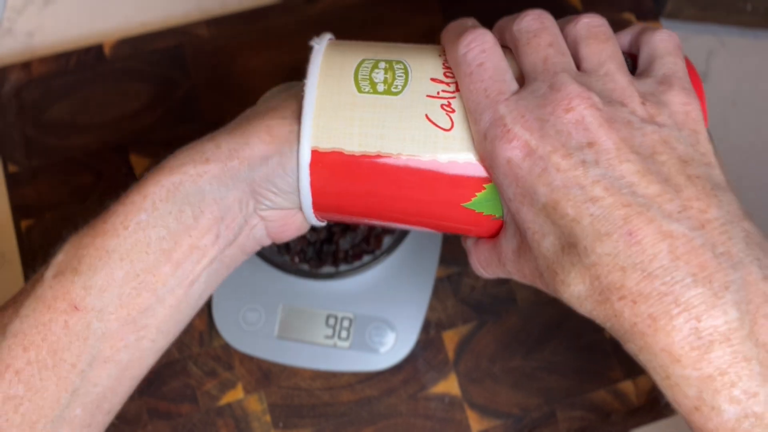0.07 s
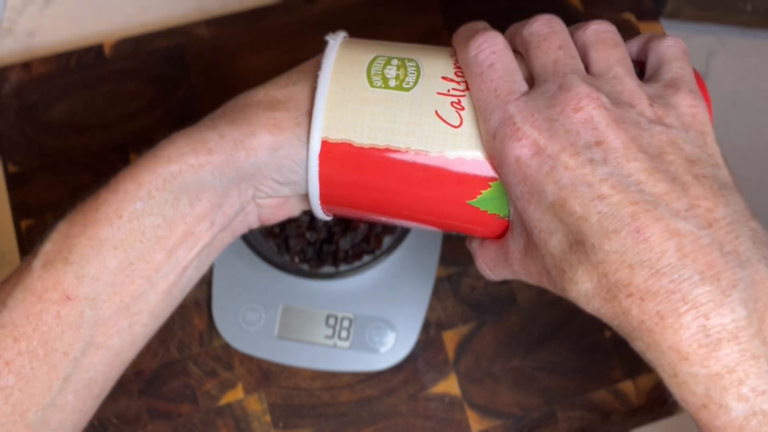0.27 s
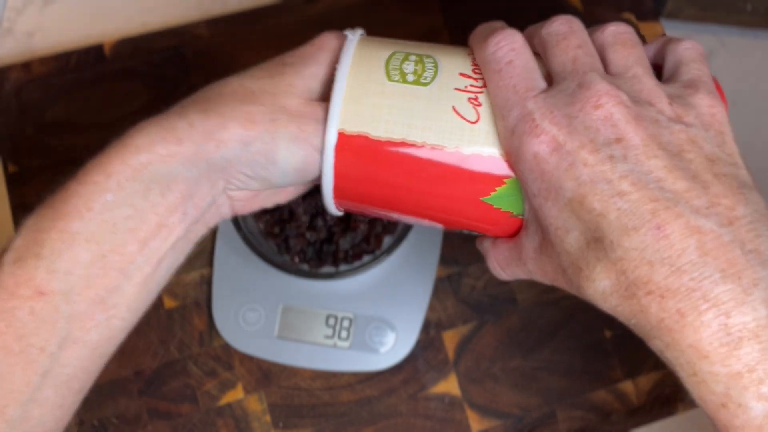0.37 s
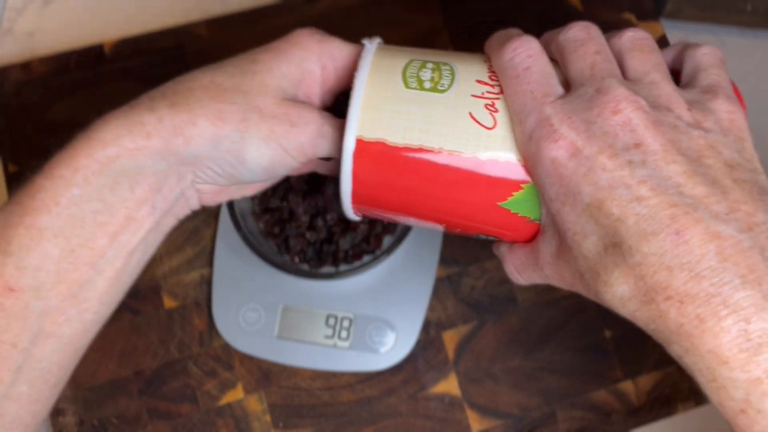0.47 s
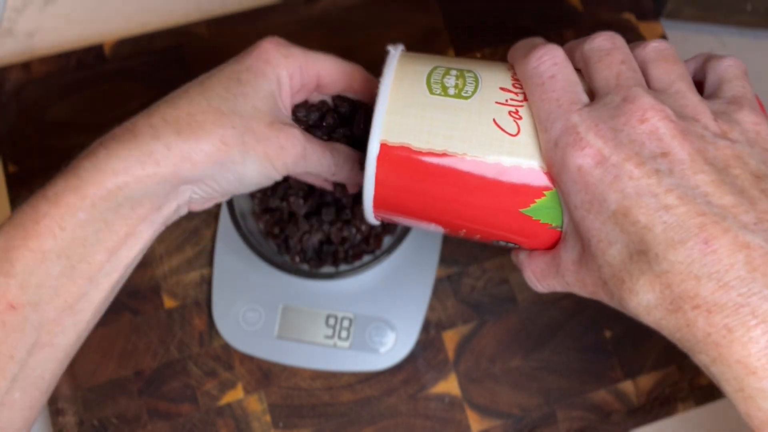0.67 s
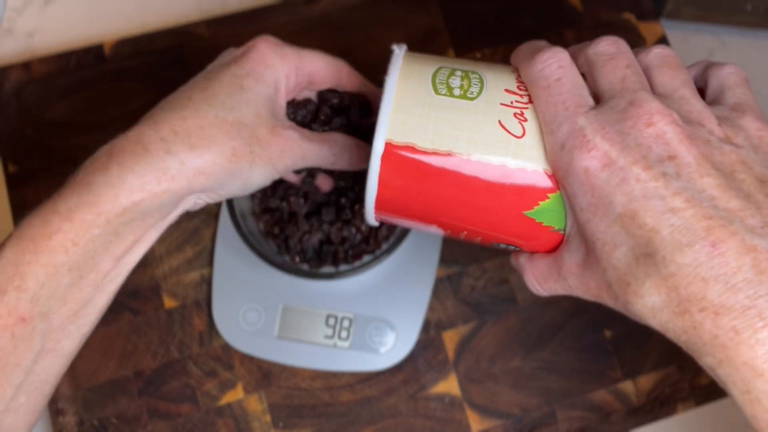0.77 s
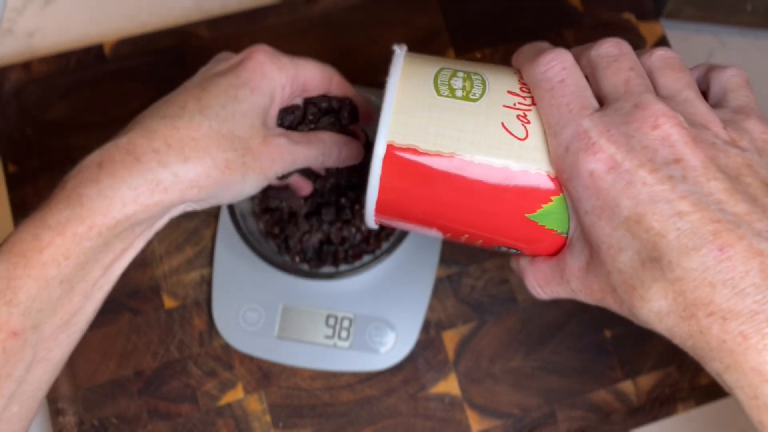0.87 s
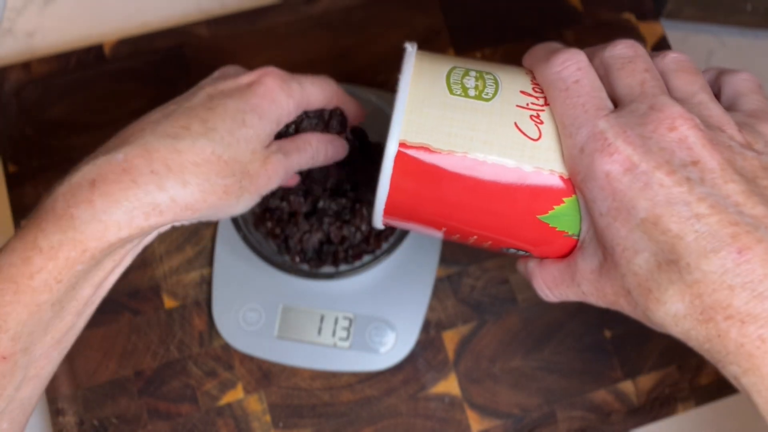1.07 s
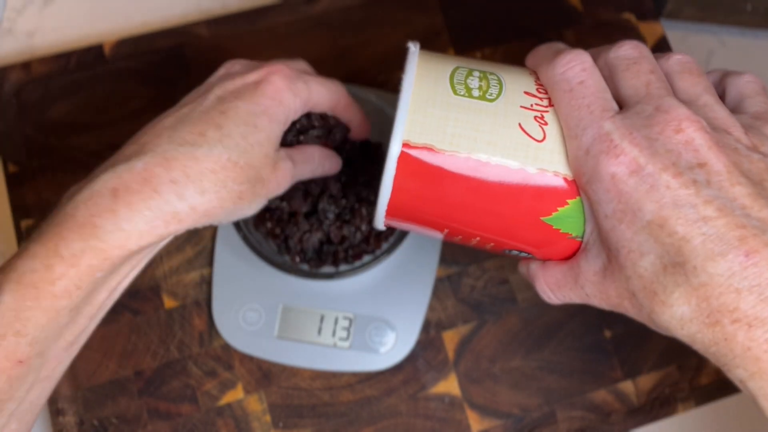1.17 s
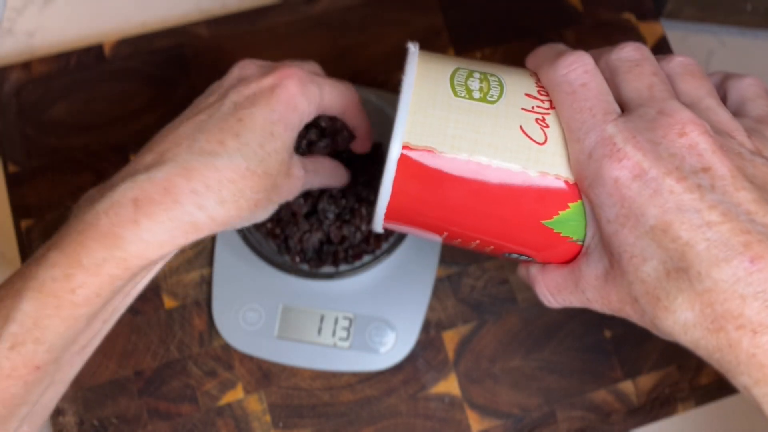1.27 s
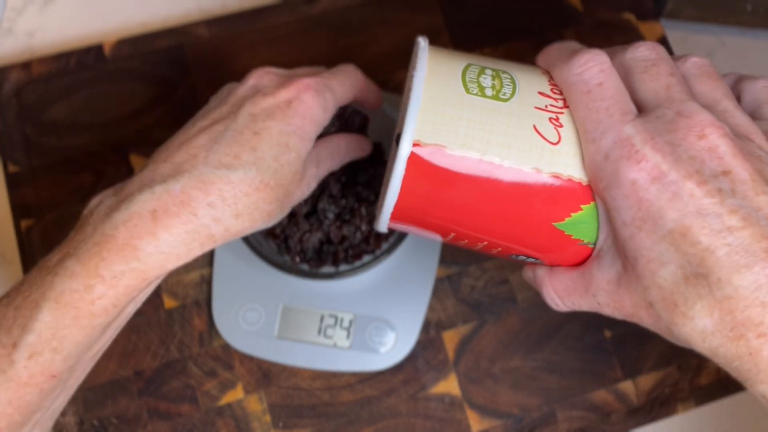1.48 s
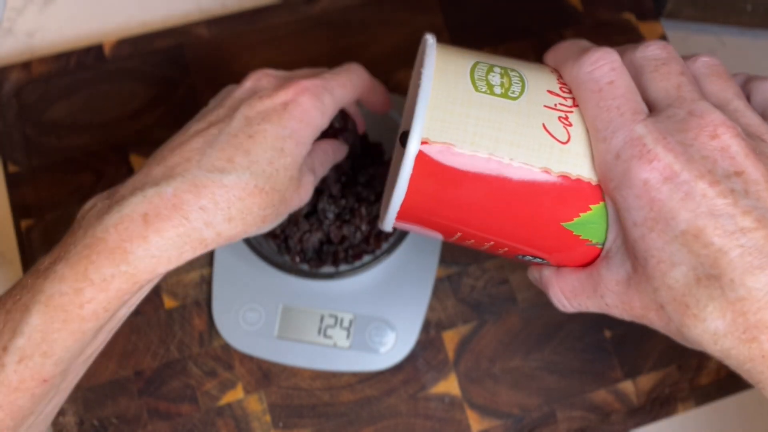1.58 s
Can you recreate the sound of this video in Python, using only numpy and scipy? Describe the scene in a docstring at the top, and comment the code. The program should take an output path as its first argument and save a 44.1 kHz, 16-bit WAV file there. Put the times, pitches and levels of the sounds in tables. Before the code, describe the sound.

Close stereo pickup in a small quiet room: dry rustling along card builds into hollow, papery knocks, fades, one soft fruit landing follows, then several faint, dull clinks of raisins in a glass bowl.

```python
"""A hand drags raisins out of a cardboard canister into a glass bowl in a quiet kitchen.
Skin and fruit rub along the card: dense friction grains, filtered into a coloured hiss with faint rings.
Clumps knock on the hollow tube, each a burst of noise and a force on damped modes; raisins ping the
glass, whose modes come in beating pairs, and land with soft tocks. Decaying noise gives the echoes;
room noise, a low rumble and a faint wavering tone, both resonant noise, lie behind."""
import sys
import numpy as np
from scipy import signal
from scipy.io import wavfile

SR = 44100
rng = np.random.default_rng(int(sys.argv[2]) if len(sys.argv) > 2 else 0)


def digitize_waveform(pressure):
    """Quantize a signal to 16-bit integers and store it at the path in sys.argv[1].

    Rows of a 2-D input are taken as channels; values are limited to [-1, 1].
    """
    field = np.atleast_2d(pressure).T
    bounded = np.clip(field, -1, 1)
    quanta = np.round(bounded * 32767).astype(np.int16)
    wavfile.write(sys.argv[1], SR, quanta)


N = 70560  # samples

# Clumps striking the tube. Each row: start in seconds, tick level in dB, level of the tick's top end in dB,
# tick rise in ms, tick T60 in ms, thump force in dB on the low, middle and high modes,
# thump delay in ms, contact length in ms.
KNOCKS = [(0.1968, -39, -49, 3.2, 17, -68, -55.5, -42, 2, 4),
          (0.3197, -50, -53, 1.3, 16, -48, -73, -59, 2.34, 2.2),
          (0.3403, -56, -56, 1.7, 16, -50, -35.5, -44, 2.47, 2.42),
          (0.3967, -66, -75, 1.3, 12, -38.5, -44, -39.5, 2.4, 3.4),
          (0.4197, -53, -48, 1.9, 16, -39.5, -47, -54, 2.7, 5.3),
          (0.4261, -43.5, -45.5, 1.5, 14, -38.5, -49, -44, 2.4, 3.9),
          (0.455, -30, -40.5, 1.77, 21.6, -22.5, -26.5, -32, 2.323, 3.72),
          (0.4654, -34.5, -66, 0.64, 10.3, -54, -62, -40, 3, 5.6),
          (0.4784, -72, -80, 1.3, 16, -51, -79, -52, 2.4, 3.8),
          (0.5067, -32.5, -62, 3.15, 11, -55, -64, -38.5, 2.4, 5),
          (0.527, -46.5, -54, 2, 15, -40.5, -38, -53, 2.36, 3),
          (0.5329, -46.5, -74.5, 1.3, 16, -55, -47, -61, 2.32, 3.9),
          (0.5958, -31.5, -38.5, 1.03, 20, -36, -27.5, -37, 2.56, 3.4),
          (0.6529, -43, -52, 3.4, 11, -46, -82, -58, 2.34, 4),
          (0.6871, -44.5, -39.5, 1.6, 15.7, -37.5, -32, -47, 2.4, 2.56),
          (0.8587, -62, -68, 1.2, 14, -65, -69, -80, 2.6, 1.9),
          (0.9381, -36.5, -65, 2.3, 11.5, -40, -37.5, -43, 2.38, 2.65)]


def amp(db):
    """Level to amplitude: 20 dB is a factor of ten."""
    return 10 ** (np.asarray(db) / 20)


def rms_one(x):
    """Normalise the mean power to 1."""
    return x / np.sqrt(np.mean(x ** 2) + 1e-20)


def in_time(rows):
    """Linear interpolation: each column of a time table at every sample."""
    seconds, *columns = np.transpose(rows)
    return [np.interp(np.arange(N) / SR, seconds, column) for column in columns]


def at_hz(points, hz):
    """Interpolation on a logarithmic frequency axis."""
    table = np.array(points)
    return np.interp(np.log(hz), np.log(table[:, 0]), table[:, 1])


def drift(rate_hz):
    """Slow fluctuation: low-passed noise of rms 1, computed every 40 samples."""
    r = np.exp(-2 * np.pi * rate_hz * 40 / SR)
    noise = rng.standard_normal(N // 40 + 2002)
    slow = signal.lfilter([1], [1, -2 * r, r * r], noise)[2000:]  # the filter has settled by then
    return np.interp(np.arange(N) / 40, np.arange(len(slow)), rms_one(slow))


def ring(x, hz, t60, lead=0):
    """Damped oscillator: a unit click starts a decaying sine of height 1 at phase lead (rad)."""
    r = amp(-60 / (t60 * SR))
    w = 2 * np.pi * hz / SR
    return signal.lfilter([np.sin(lead), r * np.sin(w - lead)], [1, -2 * r * np.cos(w), r * r], x + 1e-18)


def both_sides(x, hz, t60, lr_db, lead):
    """Stereo mode: one damped oscillator with a level and a phase difference between the channels."""
    left = amp(lr_db / 2) * ring(x, hz, t60, lead / 2)
    right = amp(-lr_db / 2) * ring(x, hz, t60, -lead / 2)
    return np.array([left, right])


def soften(x, hz):
    """Soft contact: a double one-pole low-pass removes the treble."""
    r = np.exp(-2 * np.pi * np.clip(hz, 50, 15000) / SR)
    return signal.lfilter([(1 - r) ** 2], [1, -2 * r, r * r], x)


def grains(per_s, spread_db, size):
    """Shot noise: clicks at random instants, of uneven size and random sign."""
    born = rng.random(size) < per_s / SR
    excess_db = spread_db * np.minimum(rng.exponential(1, size), 5)
    return born * amp(excess_db) * rng.choice([-1, 1], size)


def banded(source, spectrum, patchy_db):
    """Third-octave synthesis: bands of two mid-side pairs, each with its own flicker and coherence; rms 1."""
    # Likeness of the channels. Each row: frequency in Hz, left-right correlation.
    likeness = [(30, .99), (125, 0.73), (500, 0.23), (2000, 0.45), (4000, 0.56), (5000, 1), (8000, 1),
                (9000, 0.25), (11000, 0.05)]
    out = 0
    together = drift(2)  # flicker common to all bands
    lowest, highest = spectrum[0][0], spectrum[-1][0]
    edges = lowest * 2 ** np.arange(0, np.log2(highest / lowest) + .01, 1 / 3)
    for k, (low, high) in enumerate(zip(edges, edges[1:])):
        band = signal.butter(2, [low, high], "band", fs=SR, output="sos")
        mid, side = signal.sosfilt(band, source[k % 2])  # neighbouring bands use unrelated pairs
        hz = np.sqrt(low * high)
        alike = np.clip(at_hz(likeness, hz), -1, 1)
        gain = amp(at_hz(spectrum, hz) + patchy_db * (together + drift(14)))
        out = out + gain * (np.sqrt(1 + alike) * mid + np.sqrt(1 - alike) * side * [[1], [-1]])
    return rms_one(out)


def rubbing(hiss_db):
    """Sliding friction: dense grains coloured by the card, which sings faintly at narrow resonances."""
    # Colour of the rub. Each row: frequency in Hz, relative density in dB per Hz.
    rub_spectrum = [(880, -61), (1500, -3), (2020, -4), (2830, -12.5), (3360, -2.5), (4490, -8.5),
                    (6300, -3.5), (9830, -15), (10500, -13), (10800, -47.5), (14000, -40.5), (22000, -120)]
    # Rings of the card. Each row: frequency in Hz, level in dB relative to the rub, T60 in seconds.
    rub_rings = [(5920, -19, 0.053), (6425, -18, .02), (6590, -14.5, .02)]
    grains_per_s, spread_db, patchy_db = 2500, 2.5, .7
    rub = banded(grains(grains_per_s, spread_db, size=(2, 2, N)), rub_spectrum, patchy_db)
    mono = rub.mean(axis=0)
    rings = sum(amp(db) * rms_one(ring(mono, hz, t60)) for hz, db, t60 in rub_rings)
    return amp(hiss_db) * (rub + rings)


def handling(low_db):
    """Low handling noise: band-passed noise, partly correlated between the channels."""
    band = signal.butter(2, (119, 410), "band", fs=SR, output="sos")  # Hz
    mid, side = signal.sosfilt(band, rng.standard_normal((2, N)))
    return amp(low_db) * rms_one(mid + 0.49 * side * [[1], [-1]])


def knock_pushes(t):
    """Contact force: a click and a short burst of grit for each knock, rounded by the soft contact."""
    grit_amount, contact_hz = 2.36, 2400
    pushes = []
    for *_, contact_ms in KNOCKS:
        grit = rng.standard_normal(len(t)) * t * np.exp(-2000 * t / max(contact_ms, .1))
        grit = grit / np.sqrt(np.sum(grit ** 2))
        pushes.append(soften((t == 0) + grit_amount * grit, contact_hz))
    return pushes


def tube(tumble_db):
    """Modal excitation: knocks and tumbling fruit drive every mode of the tube; knocks vary from mode to mode."""
    # Modes of the tube. Each row: frequency in Hz, gain in dB, T60 in seconds,
    # left-right level difference in dB, phase lead of the left in radians.
    tube_modes = [(438, -28.5, 0.12, -40, .5), (518, -22, 0.26, -4.5, 0.27), (569, -3, 0.036, 3.5, 0.23),
                  (657, -5.5, .03, 5.5, 0.23), (863, -9, 0.021, -16, 0.26), (979, -12, 0.032, 11, .7),
                  (1182, -26.5, 0.12, 4, 1.3), (1198, 2.5, 0.011, 3.5, 1.39), (1550, 0.5, 0.017, 0, 0.56),
                  (1813, -11, 0.038, 10, 2.9), (1971, -2.5, 0.026, -2.5, 0.52), (2317, -14, 0.11, 12, 2.6),
                  (2588, -12, 0.041, 4, 3.1)]
    thump_bands_hz, low_cut_hz = (560, 1100, 1900), 502
    tumbles_per_s, tumble_spread_db, tumble_soft_hz = 720, 2, 2670
    knocks, tumble = 0, 0
    t = np.arange(SR // 40) / SR
    fruit = soften(grains(tumbles_per_s, tumble_spread_db, size=N), tumble_soft_hz)
    pushes = knock_pushes(t)
    strength_db = rng.normal(0, 1.5, (len(KNOCKS), len(tube_modes)))
    for k, (hz, db, t60, lr_db, lead) in enumerate(tube_modes):
        force = np.zeros(N + len(t))
        for knock, push, chance_db in zip(KNOCKS, pushes, strength_db):
            start_s, *_, low_db, mid_db, high_db, delay_ms, _ = knock
            i = int((start_s + delay_ms / 1000) * SR)
            thump_db = at_hz(list(zip(thump_bands_hz, (low_db, mid_db, high_db))), hz)
            # Dividing by the push's own spectrum at this mode evens out the drive
            reach = np.abs(np.sum(push * np.exp(-2j * np.pi * hz * t))) + .25
            force[i:i + len(t)] += amp(thump_db + chance_db[k]) * push / reach
        knocks = knocks + amp(db) * both_sides(force[:N], hz, t60, lr_db, lead)
        tumble = tumble + amp(db) * both_sides(fruit, hz, t60, lr_db, lead)
    out = knocks + amp(tumble_db) * rms_one(tumble)
    return signal.sosfilt(signal.butter(5, low_cut_hz, "high", fs=SR, output="sos"), out)


def ticks():
    """Broadband impact noise: each knock's bright burst and hissy tail, with the top end levelled apart."""
    # Colour of the ticks. Each row: frequency in Hz, relative density in dB per Hz.
    tick_spectrum = [(1470, -40), (2500, -4), (3150, -4), (3790, 12.5), (4550, -16.5), (5400, 4.5),
                     (5950, 10.5), (7060, -7.5), (10800, -14), (14000, -55), (22000, -120)]
    tail_db, tail_t60_s, split_hz, patchy_db = -16, 0.074, 10000, .5
    t = np.arange(SR // 10) / SR
    level = np.zeros((2, N + SR))
    for start_s, db, top_db, rise_ms, t60_ms, *_ in KNOCKS:
        rise = np.minimum(1000 * t / max(rise_ms, .05), 1)
        decay = amp(-60000 * t / max(t60_ms, 1))
        tail = amp(tail_db - 60 * t / tail_t60_s)
        i = int(start_s * SR)
        level[:, i:i + len(t)] += amp([[db], [top_db]]) * rise * (decay + tail)
    noise = banded(rng.standard_normal((2, 2, N)), tick_spectrum, patchy_db)
    below = rms_one(signal.sosfilt(signal.butter(3, split_hz, "low", fs=SR, output="sos"), noise))
    top = rms_one(signal.sosfilt(signal.butter(3, split_hz, "high", fs=SR, output="sos"), noise))
    return level[0, :N] * below + level[1, :N] * top


def bowl():
    """Split modes: raisins touch dully and chatter; close twin modes of the glass swell and beat."""
    # Raisins on the glass. Each row: start in seconds, drive of the dull touch in dB,
    # drive in dB of each of the five modes.
    pings = np.array([(0.7159, -60, -52.5, -75, -63, -84, -67), (0.7441, -59, -63, -69, -82, -75, -67),
                      (0.8989, -51, -63, -73, -61.5, -83, -80), (0.9724, -45, -58, -59, -60.5, -62, -59.5),
                      (1.4889, -48.5, -58, -69.5, -73, -91, -76),
                      (1.495, -42.5, -52.5, -75, -68, -78, -79.5),
                      (1.5094, -38.5, -49.5, -50.5, -52.5, -68, -61),
                      (1.5224, -56, -50, -53.5, -66, -81, -75), (1.5474, -46.5, -55, -57, -60, -71, -51),
                      (1.5674, -66, -77, -58, -72, -94, -81), (1.5776, -67, -51.5, -82, -60, -104, -72),
                      (1.5875, -45.5, -43, -66, -61, -81, -75)])
    # Modes of the glass. Each row: frequency in Hz, spacing of the twin mode above in Hz, T60 in seconds,
    # left-right level difference in dB, phase lead of the left in radians.
    glass_modes = [(1729, 22, 0.18, 4.5, 1.83), (3433, 11.5, 0.23, -1.5, 1.3),
                   (5700, 30, 0.098, -0.5, 0.44), (6837, 73, 0.059, -5, .3), (8490, 44, 0.081, -1, 1.44)]
    rise_ms, twin_db, thud_hz, thud_t60_s = 1.14, -16, 1744, 0.01
    chatter_per_s, chatter_spread_db, chatter_db, chatter_t60_s = 400, 2.0, -23, .05
    at = (pings[:, 0] * SR).astype(int)
    out = 0
    rise = np.exp(-1000 / (rise_ms * SR))
    fade = amp(-60 / (chatter_t60_s * SR))
    chatter = grains(chatter_per_s, chatter_spread_db, size=N)
    for k, (hz, twin_hz, t60, lr_db, lead) in enumerate(glass_modes):
        clicks = np.zeros(N)
        clicks[at] = amp(pings[:, 2 + k])
        clicks += amp(chatter_db) * chatter * signal.lfilter([1], [1, -fade], clicks)
        # A short burst at the mode's own pitch makes the ring swell in
        burst = signal.lfilter([1 - rise], [1, -rise * np.exp(2j * np.pi * hz / SR)], clicks)
        contact = burst.real * 2
        out = out + both_sides(contact, hz, t60, lr_db, lead)
        out = out + amp(twin_db) * both_sides(contact, hz + twin_hz, t60, -lr_db, -lead)
    thud = np.zeros(N)
    thud[at] = amp(pings[:, 1])
    return out + ring(soften(thud, thud_hz), thud_hz, thud_t60_s)


def tocks():
    """Impulse response: a softened click sets off one short damped ring."""
    # Resonances of fruit landing on the heap. Each row: start in seconds, click strength in dB before softening,
    # pitch in Hz, T60 in seconds, left-right level difference in dB.
    landings = [(0.127, -47, 175, 0.031, 0), (0.203, -53, 299, 0.12, 0), (1.11, -43.5, 1065, 0.029, -7.5),
                (1.111, -51.5, 1750, 0.01, 0), (1.113, -51, 337, 0.03, -5.5), (1.493, -58.5, 790, 0.09, -5),
                (1.587, -60.5, 546, .04, 21)]
    out = 0
    for start_s, db, hz, t60, lr_db in landings:
        click = amp(db) * (np.arange(N) == int(start_s * SR))
        out = out + both_sides(soften(click, 2 * hz), hz, t60, lr_db, 0.78)
    return out


def kitchen(x):
    """Diffuse reverberation: convolution with dull, decaying noise, independent on the two sides."""
    t60_s, wall_cut_hz, first_echo_s = 0.21, 3430, 0.0054
    t = np.arange(SR // 2) / SR
    tail = soften(rng.standard_normal((2, len(t))), wall_cut_hz)
    tail = tail * amp(-60 * t / t60_s) * (t > first_echo_s)
    tail = tail / np.sqrt(np.sum(tail ** 2) / 2)
    return signal.fftconvolve(x[None], tail, axes=1)[:, :N]


def room_hum():
    """Stationary background noise: Gaussian noise shaped by a spectrum, with a slight flicker."""
    # Colour of the room. Each row: frequency in Hz, relative density in dB per Hz.
    room_spectrum = [(12, -36.5), (20, 2.5), (32, -13), (54, 2), (129, -1.5), (168, -8), (271, -13.5),
                     (755, -19), (861, -64.5), (1580, -12), (2890, -31.5), (4060, -44.5), (10800, -22.5),
                     (14000, -40), (22000, -120)]
    level_db, patchy_db = -70.5, .4
    return amp(level_db) * banded(rng.standard_normal((2, 2, N)), room_spectrum, patchy_db)


def rumble():
    """Resonant noise: two equal damped oscillators in series leave one low hump."""
    # Level of the rumble. Each row: time in seconds, level in dB.
    rumble_level = [(0.0, -64.5), (0.138, -62), (0.328, -79), (0.346, -61), (0.548, -80), (0.574, -61),
                    (0.944, -83), (0.976, -69.5), (1.206, -63), (1.26, -82), (1.376, -72.5), (1.43, -75),
                    (1.564, -54.5), (1.6, -63)]
    hz, width_hz = 61.1, 30  # width of each oscillator alone
    t60 = np.log(1000) / (np.pi * width_hz)
    level_db, = in_time(rumble_level)
    hump = ring(ring(rng.standard_normal(N), hz, t60), hz, t60)
    return amp(level_db) * rms_one(hump)


def thin_tone():
    """Narrow-band noise: one sharp resonance makes noise a faint wavering tone."""
    # Level of the tone. Each row: time in seconds, level in dB.
    tone_level = [(1.0, -101), (1.06, -89), (1.1, -91), (1.17, -87), (1.26, -95.5)]
    hz, t60_s = 4550, .03
    level_db, = in_time(tone_level)
    return amp(level_db) * rms_one(ring(rng.standard_normal(N), hz, t60_s))


def scene():
    """Superposition: canister, bowl, their echoes and the background add up."""
    # Hand and fruit sliding on the card. Each row: time in seconds, hiss level in dB before the rings are added,
    # level in dB of the tumble in the tube before its low cut, level of low handling noise in dB.
    slide = [(0.0, -64, -56, -61), (0.016, -67.5, -60.5, -67.5), (0.098, -69.5, -78, -70),
             (0.124, -65.5, -65.5, -61.5), (0.172, -59.5, -67.5, -75.5), (0.208, -53.5, -59, -58.5),
             (0.244, -52.5, -62, -64), (0.342, -51.5, -60, -69), (0.368, -50.5, -65, -57),
             (0.386, -54.5, -52, -68), (0.414, -52.5, -51.5, -49), (0.48, -56, -59, -57.5),
             (0.524, -65, -60, -52), (0.542, -58, -50.5, -60), (0.578, -66, -60.5, -69),
             (0.61, -60.5, -87, -57), (0.64, -63.5, -61, -69.5), (0.704, -61, -63.5, -67.5),
             (0.726, -69, -58, -68.5), (0.836, -80, -78.5, -77), (0.872, -75.5, -77, -85.5),
             (0.94, -64.5, -61.5, -71), (0.988, -70.5, -81, -81.5), (1.132, -82.5, -76.5, -72),
             (1.172, -79, -89.5, -91), (1.394, -80.5, -82.5, -79.5), (1.416, -79.5, -85, -86),
             (1.47, -79, -83, -76.5), (1.6, -70.5, -76, -71.5)]
    echo_db, tock_echo_db = -14, -12  # the tocks' echoes are weaker by the second figure
    hiss_db, tumble_db, low_db = in_time(slide)
    hand = rubbing(hiss_db) + handling(low_db)
    near = tube(tumble_db) + ticks() + bowl()
    landings = tocks()
    echoes = amp(echo_db) * kitchen((near + amp(tock_echo_db) * landings).mean(axis=0))
    return hand + near + landings + echoes + room_hum() + rumble() + thin_tone()


def record(dry):
    """Band limiting: a steep low-pass, 60 dB down from 11.1 kHz upward, cuts the top."""
    return signal.sosfilt(signal.cheby2(16, 60, 11100, fs=SR, output="sos"), dry)


dry = scene()
out = record(dry)
digitize_waveform(out)
```